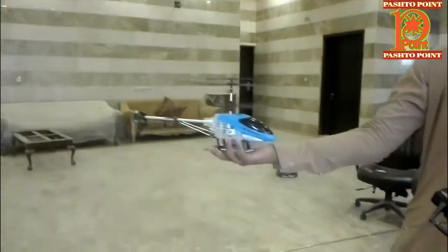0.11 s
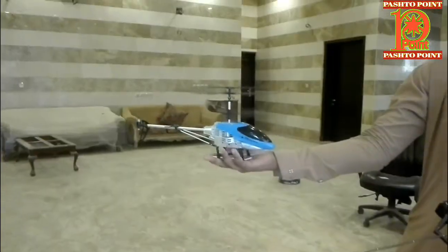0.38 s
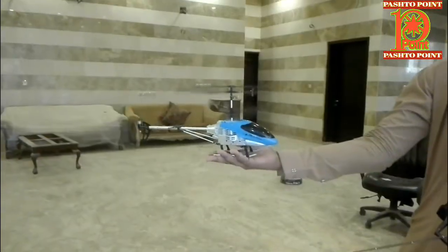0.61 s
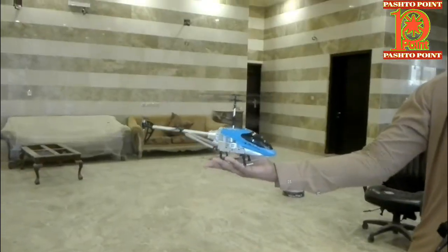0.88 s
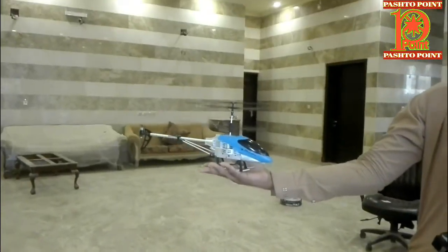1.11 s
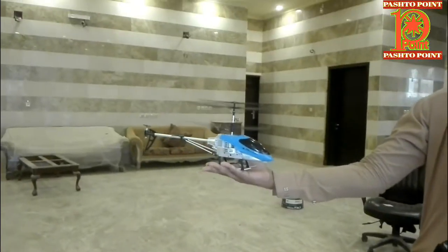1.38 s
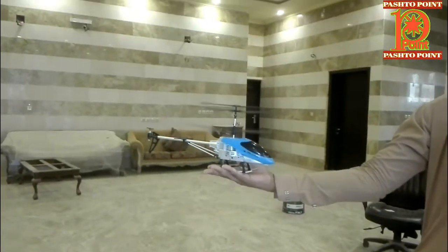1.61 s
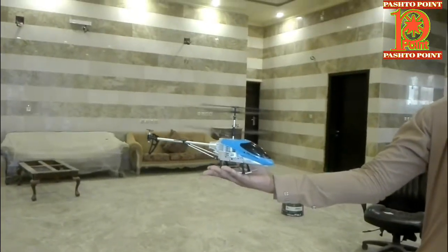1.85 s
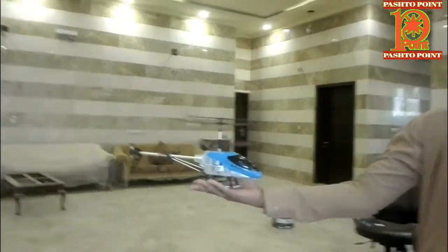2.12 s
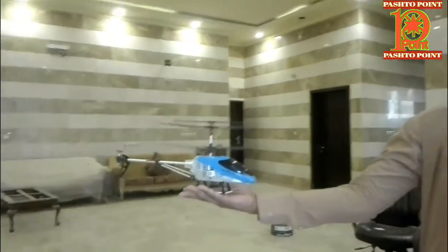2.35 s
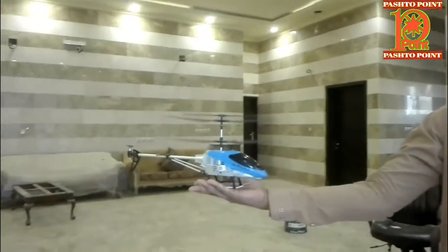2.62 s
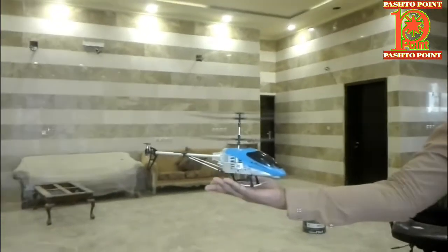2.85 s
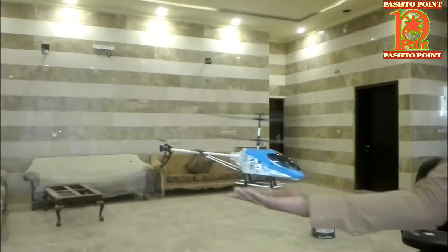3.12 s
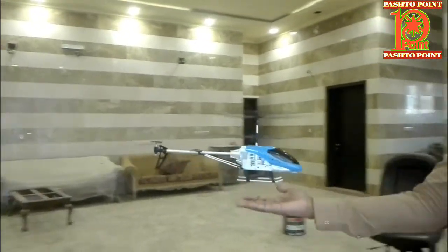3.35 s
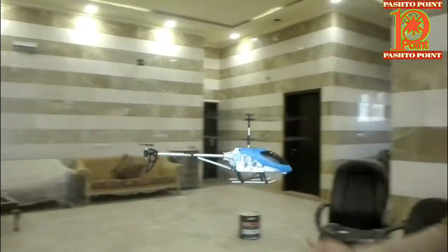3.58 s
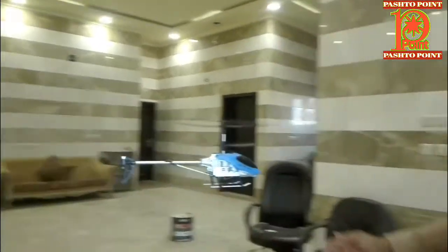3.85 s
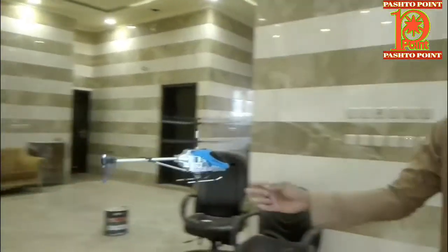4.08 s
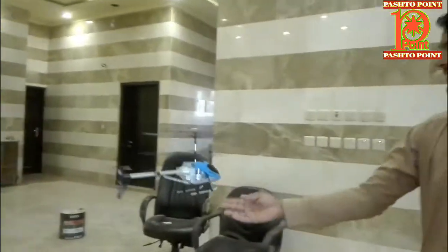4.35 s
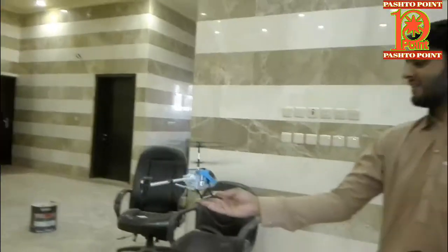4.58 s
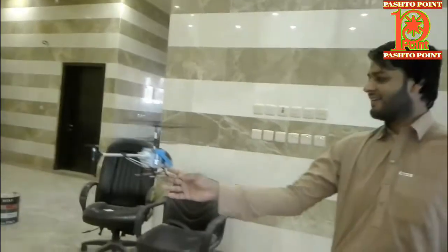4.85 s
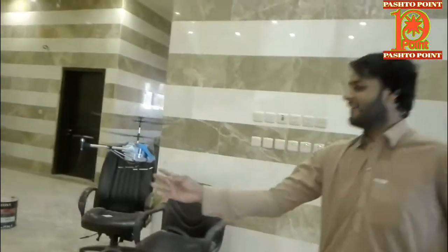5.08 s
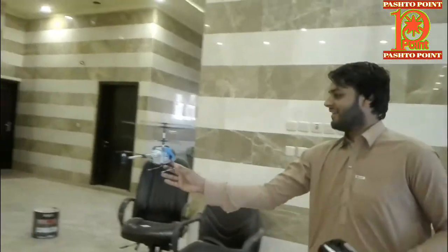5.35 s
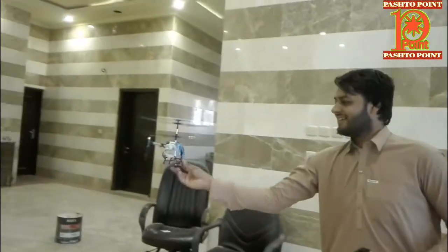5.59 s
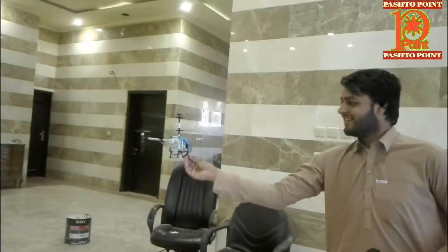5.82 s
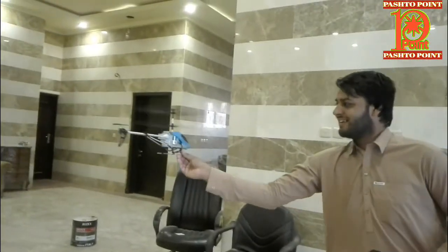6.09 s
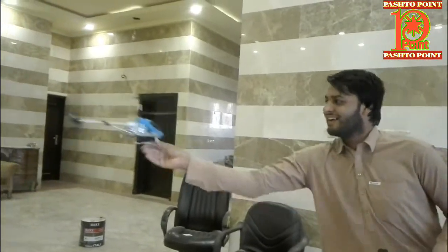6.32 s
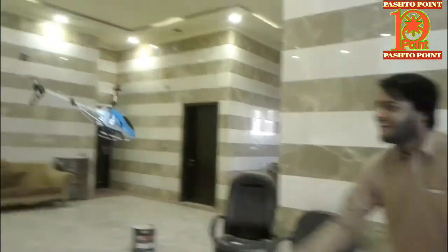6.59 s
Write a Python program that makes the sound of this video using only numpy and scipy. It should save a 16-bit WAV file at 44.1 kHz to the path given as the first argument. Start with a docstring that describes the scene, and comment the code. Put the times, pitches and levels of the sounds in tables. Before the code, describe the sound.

Small plastic rotor machine rattles and whines close by, climbs in pitch after two seconds, then hovers with steady hissing whir and low flutter.

```python
"""A thin gear whine and a buzzing rattle: a toy helicopter idles on an open hand,
spins up and hovers close by in a large stone hall. Gear teeth whine as sine lines at a rate set
by the throttle; noise from their impacts rings the resonances of the plastic shell. The blades
hiss as filtered noise, and under load they beat a low flutter over a rumbling downwash.
Both channels carry the same sound, as from one microphone."""
import sys
import numpy as np
from scipy import signal
from scipy.io import wavfile
from scipy.ndimage import uniform_filter1d

SR = 44100
rng = np.random.default_rng(int(sys.argv[2]) if len(sys.argv) > 2 else 0)


def invert_db(level):
    """Linear amplitude ratio for a level in decibels (20 dB per decade), elementwise."""
    return 10 ** (np.asarray(level, dtype=float) / 20)


def materialize(psi):
    """Save the field psi as 16-bit PCM at rate SR to the path in sys.argv[1].

    A 1-D psi becomes a single channel; in a 2-D psi each row is a channel.
    """
    bounded = np.clip(np.atleast_2d(psi).T, -1, 1)
    quanta = np.round(bounded * 32767).astype(np.int16)
    wavfile.write(sys.argv[1], SR, quanta)


N = 295470  # samples

# The throttle. Each row: time in seconds, tooth rate of the faster gear train in Hz.
THROTTLE = [(0, 2278), (0.8, 2360), (1.7, 2332), (2.05, 2420), (2.6, 2770), (3.0, 2970), (3.4, 3055),
            (5.6, 3054), (5.85, 2900), (6.4, 2976), (6.7, 2950)]
# How loud the machine reaches the microphone. Each row: time in seconds, level in dB.
FLIGHT_LEVEL = [(0, -30), (0.5, -28), (2.05, -27.5), (3.4, -24), (4.0, -25), (4.66, -26), (5.35, -27),
                (5.8, -29), (6.1, -27.5), (6.7, -27.5)]


def gears(t):
    """Gear-mesh tones: two trains a little apart whine; worn teeth modulate and so widen each line."""
    # Moments when one line sings out. Each row: centre in seconds, half-length in seconds,
    # line (1 fast train, 2 slow train, 3 second harmonic), rise in dB.
    line_swells = [(0.35, 0.16, 3, 19), (1.0, 0.18, 3, 17), (3.07, 0.16, 1, 8.5), (3.2, .1, 2, 8),
                   (3.55, 0.1, 1, 8), (3.87, .15, 2, 10), (4.85, 0.17, 2, 5), (5.1, .12, 1, 5.5),
                   (5.5, .12, 1, 5.5), (0.1, 0.24, 2, 4), (1.9, .15, 2, 5), (6.52, .13, 3, 13.5)]
    tooth_hz, up = curve(THROTTLE, t)[0], airborne(t)

    fast_db = loaded((-45, -37), t) + 1.74 * swing(t) + bumps(line_swells, t, order=1)
    slow_db = loaded((-44.5, -45.5), t) + bumps(line_swells, t, order=2)
    second_db = loaded((-52, -46.5), t) + 3.7 * swing(t) + 9 * strain(t)
    second_db += bumps(line_swells, t, order=3)

    rate_ratio = 0.95 + 0.018 * up  # the trains draw closer under load
    slack = 0.007 - 0.0045 * up  # unloaded teeth rattle and blur the pitch

    def line_phase(hz):
        """Phase is the integral of frequency; chance in both smears the line."""
        smeared_hz = hz * (1 + slack * wander(18))
        return 2 * np.pi * np.cumsum(smeared_hz) / SR + 0.3 * wander(60)

    fast = line_phase(tooth_hz)
    slow = line_phase(tooth_hz * rate_ratio)
    lines = invert_db(fast_db + 1.6 * wander(8)) * np.sin(fast)
    lines += invert_db(slow_db + 3.5 * wander(12)) * np.sin(slow)

    # Random amplitude modulation turns the second harmonics into narrow bands of noise.
    second = (0.7 * up ** 3 + wander(200)) * np.sin(2 * fast)
    second += wander(200) * np.cos(2 * fast)
    second += wander(200) * np.sin(2 * slow)
    lines += invert_db(second_db) * second

    def skirt_power(f, s):
        """Noise sidebands surround the mesh tone and its second harmonic."""
        hz, load = curve(THROTTLE, s)[0], airborne(s)
        first_skirt = invert_db(2 * (4 + 4.7 * load)) * peak(f, 0.99 * hz, 363)
        second_skirt = invert_db(2 * (2.5 + 2.0 * load)) * peak(f, 1.966 * hz, 670)
        return first_skirt + second_skirt

    skirt = coloured(chatter(t, throb=0.24, flicker_db=0.8), skirt_power)
    return lines + invert_db(curve(FLIGHT_LEVEL, t)[0]) * skirt


def skids(t):
    """Resonance under once-a-turn forcing: two loose frame parts buzz on the hand, most at idle."""
    out = np.zeros(N)
    for centre_hz, width_hz, db in [(3970, 690, 5.9), (4574, 340, 10.4)]:
        buzz = chatter(t, throb=0.25 + 1.5 * np.exp(-t / 0.19), flicker_db=3.5)

        def part_power(f, s):
            """A resonance below a sharp upper edge fades as the rotors take the load."""
            sharp_edge = 1 + (f / 4900) ** 60
            return (1 - 0.86 * airborne(s)) * peak(f, centre_hz, width_hz) / sharp_edge

        out += invert_db(db) * coloured(buzz, part_power)
    return invert_db(curve(FLIGHT_LEVEL, t)[0]) * out


def shell(t):
    """Modal resonance: tooth impacts ring the plastic shell; the hand damps some modes, favours others."""
    # Each row: mode frequency in Hz, width in Hz, relative level in dB on the hand and in the air.
    shell_modes = [(915, 36, -19, -3), (1048, 77, -13.5, -15.5), (1200, 34, -8.5, 0),
                   (1382, 66, -2.5, -2.5), (1450, 155, -24, -5.5), (1640, 78, -10.5, -3),
                   (1780, 170, -15, -8), (2058, 16, -9, -1)]
    let_go_s, let_go_span_s = 3.47, 0.27  # the skids leave the hand

    def mode_power(f, s):
        """Superposition of the modes, blended from held to free."""
        free = 0.5 + 0.5 * np.tanh((s - let_go_s) / let_go_span_s)
        return sum(invert_db(2 * (held_db + (free_db - held_db) * free)) * peak(f, hz, width_hz)
                   for hz, width_hz, held_db, free_db in shell_modes)

    ring = coloured(chatter(t, throb=0.09, flicker_db=0.6), mode_power)
    running_rms = np.sqrt(uniform_filter1d(ring ** 2, size=SR))  # over one second
    rattle_db = -33.5 + 0.082 * swing(t) + 1.5 * strain(t)  # hardly follows the flight level
    return invert_db(rattle_db) * ring / running_rms


def blades(t):
    """Broadband flow noise, coloured by frame resonances; its three ranges follow the level unequally."""
    # Hiss spectrum. Each row: frequency in Hz, relative density in dB per Hz on the hand and in the air.
    hiss_spectrum = [(300, -29.5, -16), (694, -21.5, -18.5), (900, -14.5, -8), (1500, -2.5, -2.5),
                     (2410, -6.5, -9.5), (3240, -6, -0.5), (4500, -5.5, -6.5), (4740, -6, -7),
                     (7300, -4.5, -3), (7940, -10, -6.5), (9740, -13.5, -11.5), (12000, -17.5, -13),
                     (13600, -19, -15.5), (14300, -26, -25)]
    # Rotor head and frame modes. Each row: frequency in Hz, width in Hz,
    # dB over the hiss on the hand and in the air.
    frame_modes = [(3960, 280, 5.5, 4), (4780, 260, -11, 6), (7000, 380, 1.5, 0.5), (9160, 380, 2, 4.5),
                   (11160, 1060, 6, 6), (13740, 300, 4, 5)]
    # Bands that flare briefly. Each row: centre in seconds, half-length in seconds,
    # frequency in Hz, width in Hz, dB over the hiss.
    glints = [(3.88, 0.13, 11300, 550, 10.5), (2.7, 0.3, 11300, 820, 5), (0.98, .12, 4660, 120, 6),
              (3.73, 0.27, 13100, 470, 9), (0.78, 0.55, 233, 48, 13.5), (3.15, 0.27, 9470, 490, 5.5),
              (5.3, 0.17, 8900, 410, 6), (6.48, 0.16, 9100, 620, 8), (0.046, 0.072, 1640, 45, 18.5),
              (3.66, 0.11, 1390, 71, 9.5), (1.3, 0.32, 1680, 59, 8.5), (0.074, .1, 320, 150, 13.5)]

    def hiss_power(f, s):
        """Source spectrum times resonant gain, with a slow patchy drift."""
        up = airborne(s)
        at_hz, held, free = np.transpose(hiss_spectrum)
        held, free = (np.interp(np.log(f + 1), np.log(at_hz), db) for db in (held, free))
        rings = sum((invert_db(2 * (held_db + (free_db - held_db) * up)) - 1) * peak(f, hz, width_hz)
                    for hz, width_hz, held_db, free_db in frame_modes)
        flares = sum(invert_db(2 * db) * peak(f, hz, width_hz) * np.exp(-((s - centre_s) / span_s) ** 2)
                     for centre_s, span_s, hz, width_hz, db in glints)
        hiss_db = held + (free - held) * up + 1.2 * patches(f, s)
        return invert_db(2 * hiss_db) * (1 + rings + flares)

    def band(low_hz, high_hz, throb, flicker_db):
        """Bandpass filtering keeps one range of the hiss."""
        return coloured(chatter(t, throb, flicker_db),
                        lambda f, s: hiss_power(f, s) * (f >= low_hz) * (f < high_hz))

    low = band(0, 2600, throb=0.033, flicker_db=1.0)
    middle = band(2600, 7800, throb=0.061, flicker_db=1.0)
    treble = band(7800, 12600, throb=0.06, flicker_db=1.6)
    treble = treble + band(12600, np.inf, throb=0.06, flicker_db=1.9)

    hiss = invert_db(-19.5 + 0.082 * swing(t)) * low
    hiss += invert_db(-18 + swing(t)) * middle
    hiss += invert_db(-16 + 0.84 * swing(t) + 1.1 * strain(t)) * treble
    return hiss


def rotor_air(t):
    """Blade-pass tones: a fuzzy harmonic series flutters unevenly over low-pitched downwash noise."""
    # Blade pass and its overtones in order. Each row: level in dB at idle, level in dB in the air.
    flutter_db = [(-71, -50), (-63.5, -55), (-80, -64)]
    # Swells of the flutter. Each row: centre in seconds, half-length in seconds,
    # harmonic number, rise in dB.
    flutter_swells = [(2.42, .08, 1, 19.5), (3.02, 0.25, 1, 11.5), (3.9, 0.11, 1, 5), (4.5, 0.26, 1, 9.5),
                      (5.3, .2, 1, 7), (5.94, 0.068, 1, 9), (2.95, .2, 2, 7), (4.55, 0.44, 2, 7),
                      (5.7, 0.13, 2, 8.5), (4.1, .2, 3, 13), (4.75, 0.32, 3, 13)]
    # Downwash spectrum. Each row: frequency in Hz, relative density in dB per Hz.
    wash_spectrum = [(20, 1), (60, 1), (130, -2), (250, -14), (500, -23.5), (800, -36)]
    teeth_per_pass = 25.6

    phase = 2 * np.pi * np.cumsum(curve(THROTTLE, t)[0] / teeth_per_pass) / SR
    flutter = np.zeros(N)
    for k, pair_db in enumerate(flutter_db, start=1):
        level = invert_db(loaded(pair_db, t) + bumps(flutter_swells, t, order=k))
        fuzzy_line = (0.9 + wander(25)) * np.sin(k * phase) + wander(25) * np.cos(k * phase)
        flutter += level * fuzzy_line

    at_hz, density_db = np.transpose(wash_spectrum)

    def wash_power(f, s):
        """Low-frequency flow spectrum, constant in time."""
        return invert_db(2 * np.interp(np.log(f + 1), np.log(at_hz), density_db, right=-90))

    wash = evened(coloured(rng.standard_normal(N), wash_power))
    # The downwash shares a little of the first harmonic's swells.
    wash_db = loaded((-51.5, -45.5), t) + 0.24 * bumps(flutter_swells, t, order=1)
    return flutter + invert_db(wash_db) * wash


def hall(x, t60=0.77, wet_db=-7):
    """Reverberation: direct sound plus sparse, exponentially decaying echoes; t60 in seconds."""
    slots = np.arange(300, SR, 20)  # samples; the tail starts about 7 ms after the direct sound
    at = slots + rng.integers(0, 20, len(slots))
    tail = np.zeros(SR + 20)
    tail[at] = rng.choice([-1., 1.], len(at)) * invert_db(-60 * at / SR / t60)
    return x + invert_db(wet_db) * signal.fftconvolve(x, tail / np.linalg.norm(tail))[:N]


def chatter(t, throb, flicker_db):
    """Amplitude modulation: noise throbs once a rotor turn, most at idle, and flickers; rms 1."""
    teeth_per_turn = 70
    turn = 2 * np.pi * np.cumsum(curve(THROTTLE, t)[0]) / teeth_per_turn / SR
    beat = 1 + throb * (1 - 0.44 * airborne(t)) * np.cos(turn + 0.5 * wander(1.0))
    flicker = invert_db(flicker_db * (wander(210) + 0.38 * wander(5.8)))
    return evened(beat * flicker * rng.standard_normal(N))


def airborne(t):
    """Load follows rotor speed: 0 at idle, 1 when the rotors carry the weight."""
    idle_hz, hover_hz = 2414, 2958  # tooth rates
    return np.clip((curve(THROTTLE, t)[0] - idle_hz) / (hover_hz - idle_hz), 0, 1)


def strain(t):
    """Torque goes with acceleration: the smoothed rise of the tooth rate, 1 at 600 Hz per second."""
    rise_hz_per_s = np.gradient(curve(THROTTLE, t)[0]) * SR
    return uniform_filter1d(rise_hz_per_s, size=SR // 4).clip(0) / 600


def swing(t):
    """Relative level: dB of the flight level above its usual -27 dB."""
    return curve(FLIGHT_LEVEL, t)[0] + 27


def loaded(pair_db, t):
    """Load dependence: blends a level in dB from idle to flight."""
    idle_db, air_db = pair_db
    return idle_db + (air_db - idle_db) * airborne(t)


def bumps(rows, t, order):
    """Gaussian envelopes: sums the rises in dB of the rows that belong to one line."""
    return sum(db * np.exp(-((t - centre_s) / span_s) ** 2)
               for centre_s, span_s, k, db in rows if round(k) == order)


def curve(rows, t):
    """Linear interpolation: reads every column of a table at the times t."""
    s, *columns = np.transpose(rows)
    return [np.interp(t, s, c) for c in columns]


def evened(x):
    """Power normalisation: scales to rms 1."""
    return x / np.sqrt(np.mean(x ** 2) + 1e-20)


def wander(rate_hz):
    """Lowpass-filtered noise: slow chance of rms 1, up to about rate_hz."""
    r = np.exp(-2 * np.pi * rate_hz / SR)
    noise = rng.standard_normal(N + SR)
    return evened(signal.lfilter([1], [1, -2 * r, r * r], noise)[SR:])  # drops the filter's start


def patches(f, s):
    """Two-dimensional smoothing: chance in patches of about 400 Hz by a quarter second, rms 1."""
    field = rng.standard_normal((len(s), len(f))).T
    for _ in range(2):
        field = uniform_filter1d(field, size=14, axis=0)
        field = uniform_filter1d(field, size=16, axis=1)
    return evened(field)


def peak(hz, centre_hz, width_hz):
    """Resonance curve: power of a steep resonance, 1 at its centre."""
    return 1 / (1 + (1.2 * (hz - centre_hz) / width_hz) ** 2) ** 2


def coloured(x, power):
    """Time-varying filtering: weights the short-time spectrum of x by power(hz, t)."""
    size, overlap = 2048, 1536  # samples
    hz, t, z = signal.stft(x, SR, nperseg=size, noverlap=overlap)
    z = z * np.sqrt(power(hz[:, None], t))
    return signal.istft(z, SR, nperseg=size, noverlap=overlap)[1][:N]


def scene():
    """Superposition: the sources add, the gears with the hall's reverberation, alike in both channels."""
    t = np.arange(N) / SR
    mono = hall(gears(t)) + skids(t) + shell(t) + blades(t) + rotor_air(t)
    return np.array([mono, mono])


def roll_off(x):
    """The treble ends steeply here."""
    return signal.sosfilt(signal.butter(12, 14890, fs=SR, output="sos"), x)


def record(dry):
    """Band limitation: a steep linear-phase lowpass removes the highest treble."""
    edge = signal.firwin(numtaps=511, cutoff=14350, window=("kaiser", 9), fs=SR)
    finished = signal.oaconvolve(dry, edge[None], "same")
    return roll_off(finished)


dry = scene()
out = record(dry)
materialize(out)
```